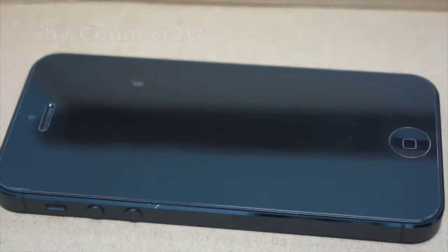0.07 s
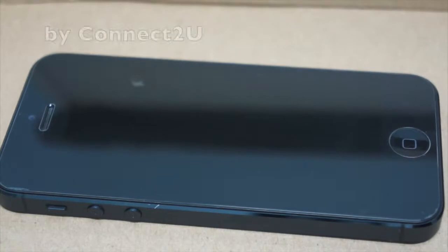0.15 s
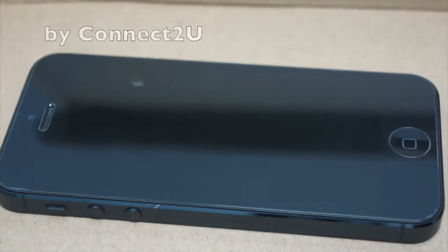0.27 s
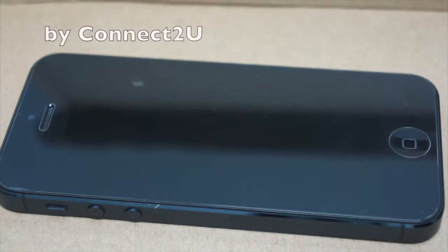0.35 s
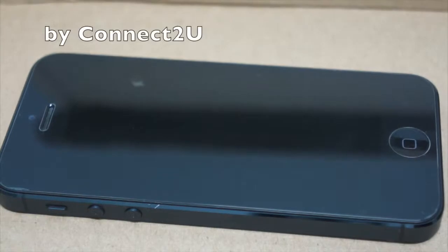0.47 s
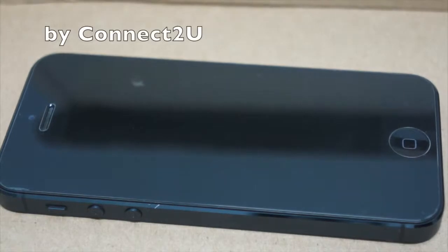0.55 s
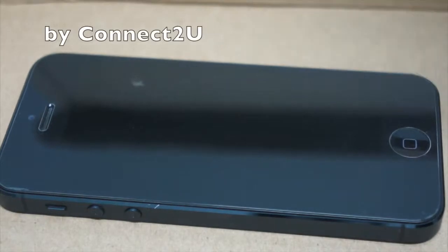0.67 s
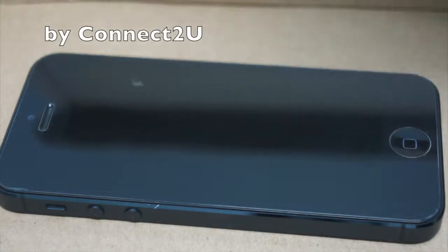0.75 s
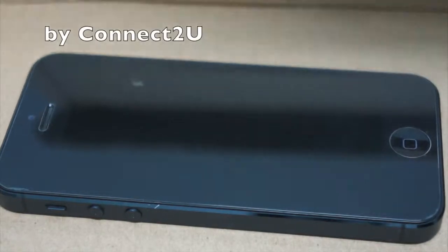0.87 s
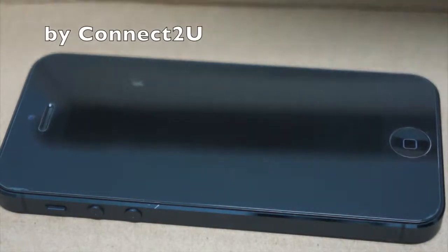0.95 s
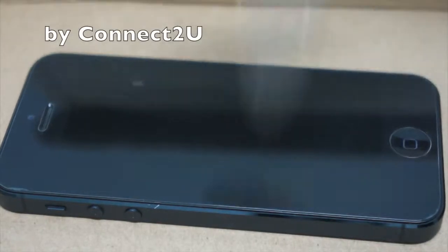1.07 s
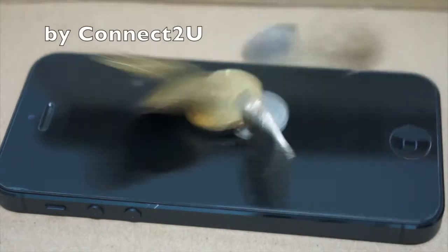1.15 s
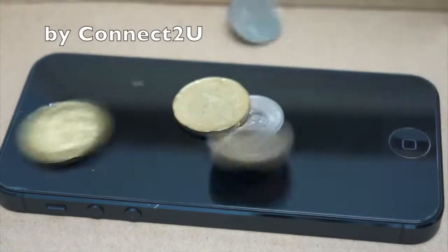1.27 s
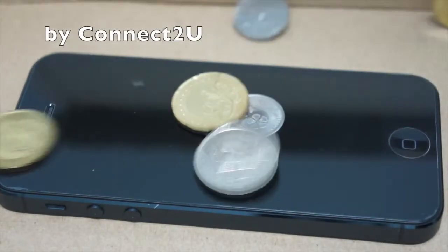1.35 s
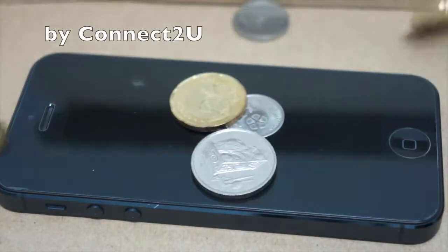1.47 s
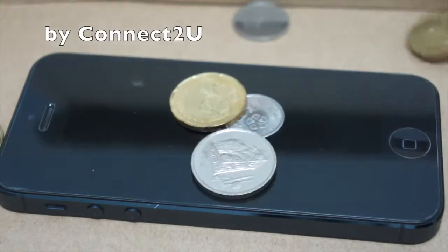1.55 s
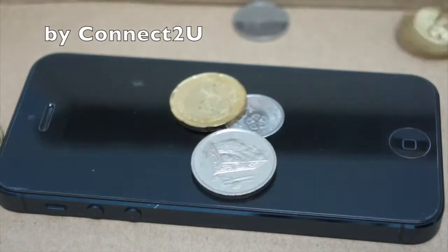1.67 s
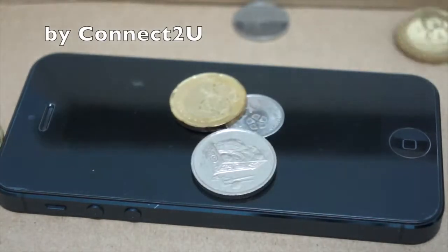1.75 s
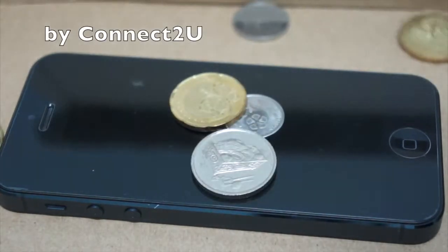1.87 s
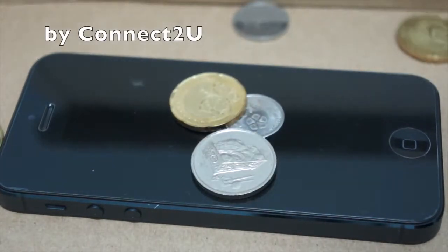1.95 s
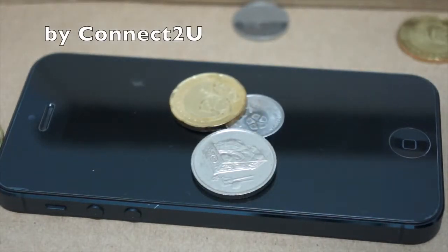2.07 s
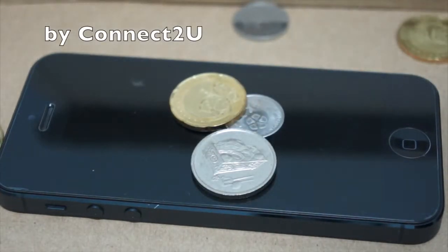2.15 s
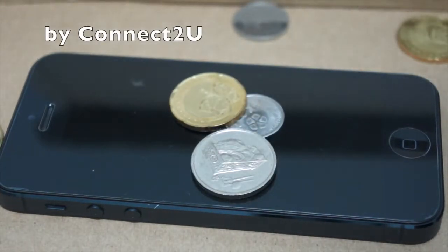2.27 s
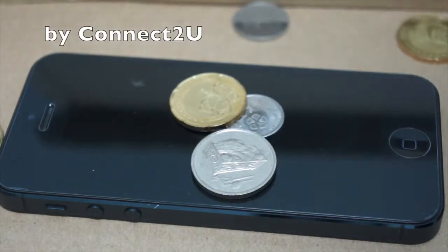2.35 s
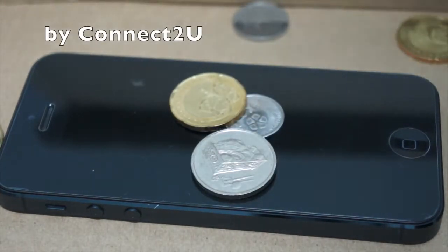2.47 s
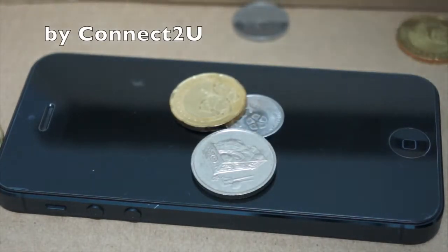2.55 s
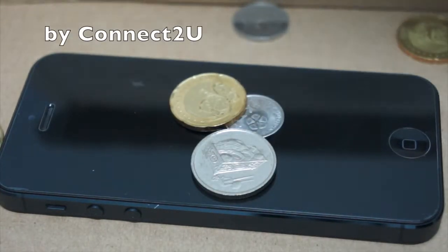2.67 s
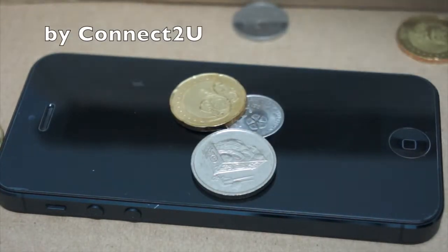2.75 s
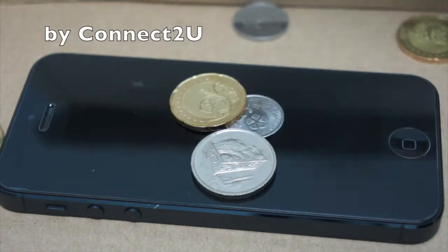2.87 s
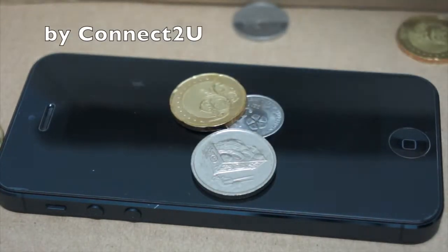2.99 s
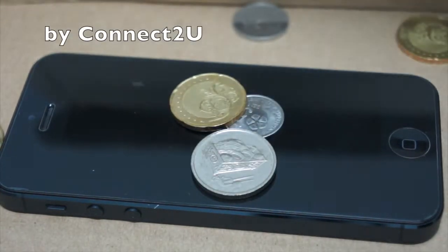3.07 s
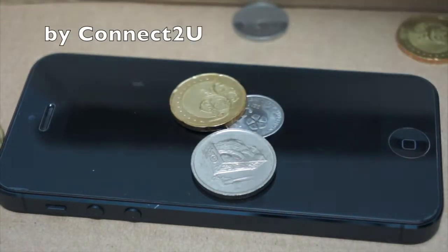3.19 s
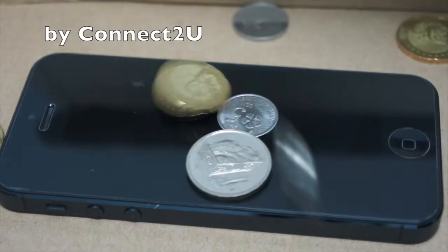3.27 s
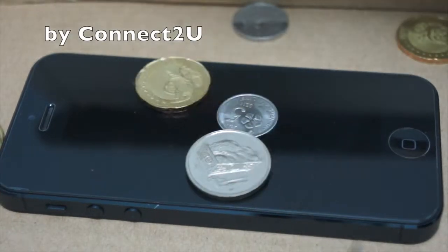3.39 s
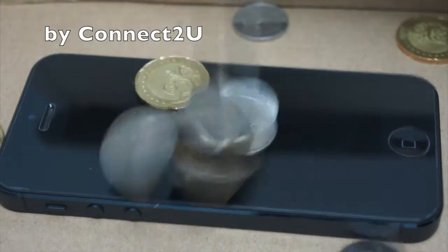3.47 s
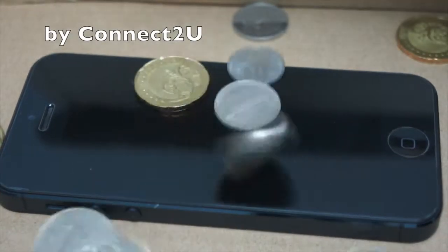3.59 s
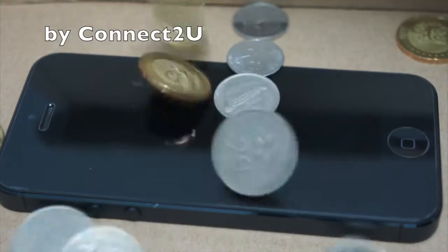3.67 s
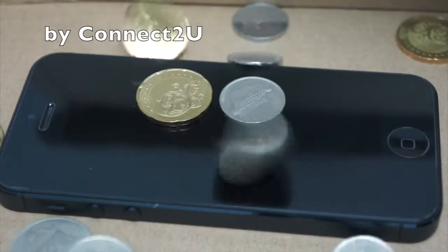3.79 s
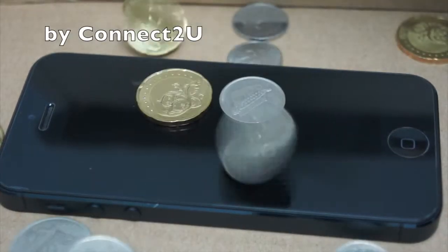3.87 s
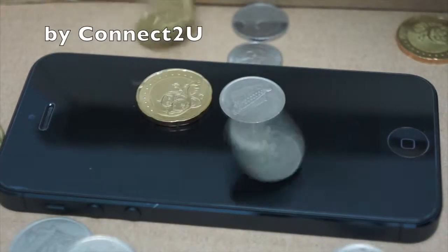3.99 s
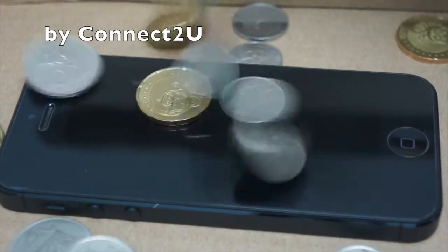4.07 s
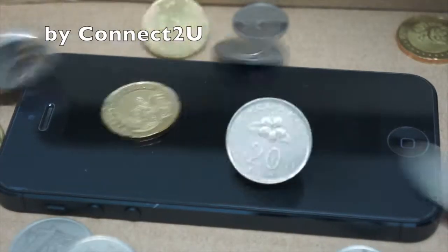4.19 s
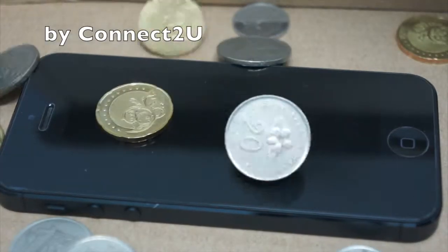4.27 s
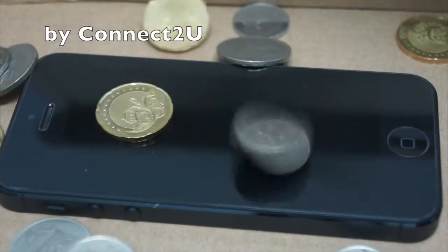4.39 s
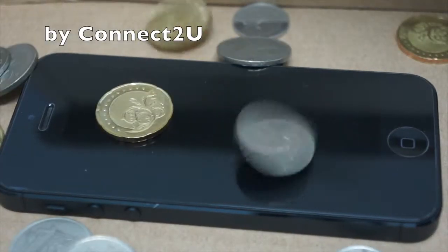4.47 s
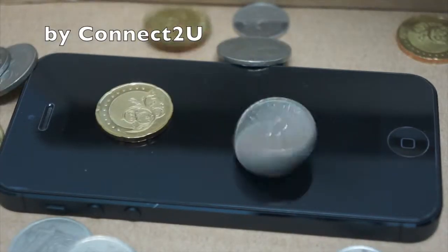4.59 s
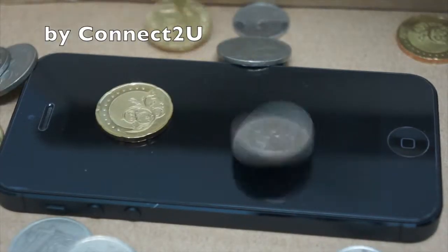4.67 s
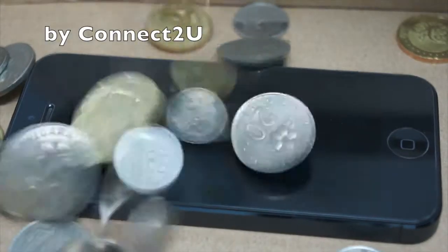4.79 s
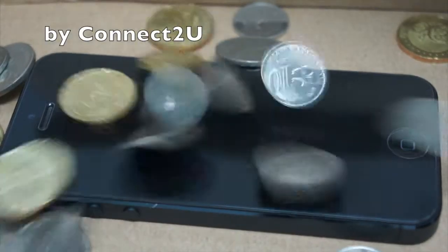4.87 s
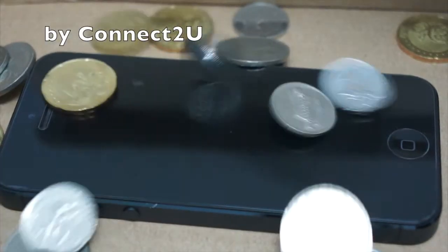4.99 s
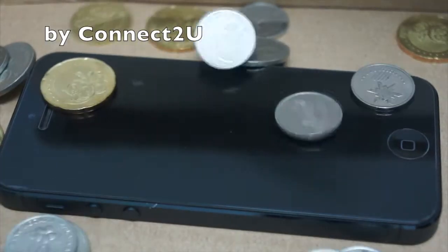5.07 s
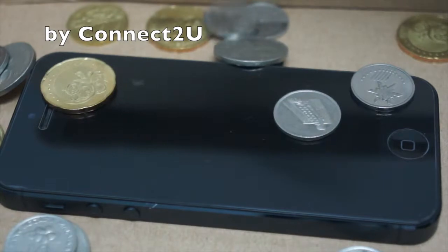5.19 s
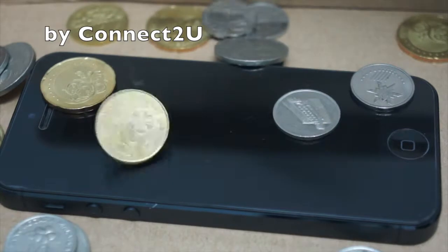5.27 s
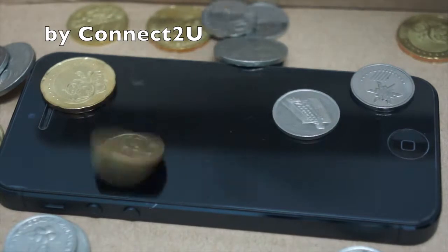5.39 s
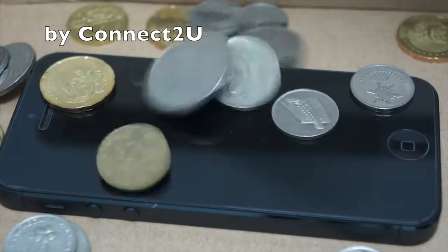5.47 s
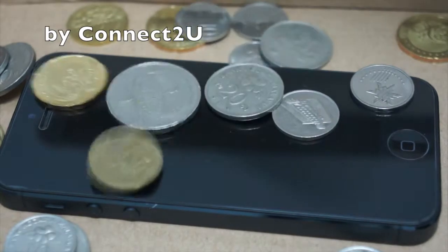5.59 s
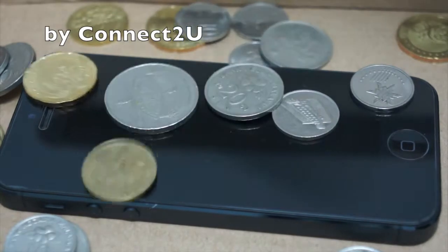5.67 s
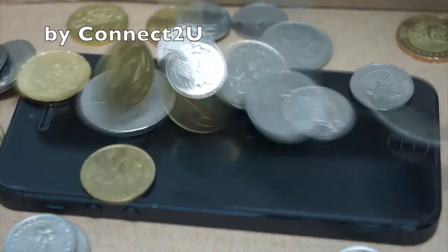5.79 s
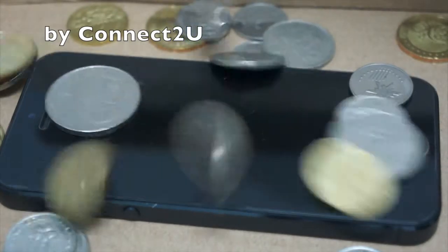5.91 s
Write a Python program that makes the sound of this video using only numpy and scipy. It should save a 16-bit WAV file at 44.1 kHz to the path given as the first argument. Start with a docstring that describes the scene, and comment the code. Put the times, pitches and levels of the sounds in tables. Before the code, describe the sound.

Loose coins jingle in a hand, then clatter in two bright showers onto a phone's glass and the cardboard box around it.

```python
"""Coins falling on glass and cardboard

Coins jingle in a hand, then fall in two showers onto a phone's glass face that lies in a cardboard box.
Each blow is a filtered noise crack plus damped modes: coins chink, glass clacks, cardboard slaps and thuds.
Sliding coins are crowds of such blows at chance times. Ringing coins are dying sines that swell first,
as the recorder's gain recovers after a blow.
Diffuse noise gives the small room's reply and its tone; a close stereo recorder limits the peaks."""
import sys
import numpy as np
from scipy import signal
from scipy.fft import rfft, irfft, next_fast_len
from scipy.io import wavfile
from scipy.ndimage import uniform_filter1d, minimum_filter1d, map_coordinates

SR = 44100
rng = np.random.default_rng(int(sys.argv[2]) if len(sys.argv) > 2 else 0)


def bounce(signal):
    """Save signal as a 16-bit WAV file at the path given by the first command-line argument."""
    frames = np.transpose(np.atleast_2d(signal))
    limited = np.clip(frames, -1, 1)
    pcm = np.round(limited * 32767).astype(np.int16)
    wavfile.write(sys.argv[1], SR, pcm)


N = 261954

# Room tone: (frequency [Hz], relative level per Hz [dB])
AIR_SPECTRUM = [(20, -34), (100, -19.5), (260, 1.5), (700, 1.5), (1300, -0.5), (2600, -4.5), (5000, -11.5),
                (11000, -1.5)]
# Room tone: (time [s], level [dB])
AIR_LEVEL = [(0, -120), (.1, -120), (.115, -47), (.7, -48.5), (1.1, -52), (2.2, -60.5), (3.2, -57),
             (5.9, -88)]
# Decay of the room: (frequency [Hz], 60 dB decay time [s])
ROOM_T60 = [(150, 0.41), (800, 0.39), (3000, 0.44), (10000, 0.19)]
# Left-right likeness of diffuse sound: (frequency [Hz], correlation [1])
LIKENESS = [(100, 1), (400, 0.94), (900, 0.89), (2000, 0.59), (4500, 0.38), (10000, 0.29)]
# Level of the bass in the coin sounds and their echo: (time [s], level [dB])
BASS_LEVEL = [(0, -6), (2.0, 3.5), (2.2, -6), (3.4, 3), (3.85, 3.5), (4.1, -3.5), (5.24, -3), (5.32, -3.5),
              (5.94, -9.5)]

# Colour of flat noise and of each struck body: (frequency [Hz], relative level per Hz [dB])
WHITE = [(20, 0), (20000, 0)]
BOX_SPECTRUM = [(60, -36.5), (130, -48.5), (240, -19), (480, -6), (650, -0.5), (860, 4), (1200, 0),
                (1700, -19)]
CARD_SPECTRUM = [(1200, -9), (1800, -2), (3200, -1.5), (4000, -7.5), (5500, -13.5)]
PHONE_SPECTRUM = [(150, -26.5), (550, -23.5), (820, -0.5), (1150, -0.5), (1500, 0), (2000, -26.5)]
GLASS_SPECTRUM = [(1200, -25), (1500, -18.5), (1900, -9.5), (2700, -5.5), (5500, -1.5), (7500, -4)]
COIN_SPECTRUM = [(3500, -13), (5300, -9.5), (7000, -3), (8600, 1.5), (10200, 2), (11000, -8.5),
                 (12000, -39.5)]
# Modes of each struck body: (frequency [Hz])
BOX_MODES = [254, 399, 602, 681, 735, 841, 845, 934]
CARD_MODES = [1573, 1795, 1950, 2140, 2286, 2570, 3140]
PHONE_MODES = [950, 1100, 1203, 1198]
GLASS_MODES = [2650, 2808, 3194, 3740, 4170]

# The handful is shaken or shifted:
# (time [s], length [s], relative chink level [dB], relative clack level [dB])
JINGLES = [(0.105, .11, -31, -40), (0.303, 0.018, -31.5, -41), (0.383, 0.19, -45.5, -41),
           (0.702, 0.069, -30, -40), (0.89, 0.052, -45, -62), (0.613, 0.14, -74, -58),
           (2.104, 0.13, -33, -45), (2.158, 0.16, -28.5, -49), (2.41, 0.07, -32, -44),
           (2.518, 0.12, -48, -49), (2.619, 0.052, -31, -31.5), (2.732, 0.094, -58, -51),
           (2.887, 0.1, -62, -57), (3.214, 0.04, -44.5, -42.5)]
# A spill of coins lands and skitters: (time [s], length [s], relative chink level [dB],
# relative clack level [dB], relative knock level [dB], share on the cardboard before clipping [1])
SPILLS = [(1.143, 0.08, -23, -26, -25.5, .5), (1.242, 0.28, -34.5, -31, -26.5, 1.2),
          (1.544, 0.024, -34.5, -30, -26, .9), (1.586, 0.21, -26, -39, -35.5, .95),
          (1.812, .15, -21.5, -34.5, -28.5, .95), (1.991, 0.025, -24.5, -34, -29, .95),
          (3.271, 0.075, -30, -30.5, -31.5, 0.07), (3.374, 0.057, -30.5, -34, -28, 4),
          (3.513, 0.36, -29.5, -32, -29.5, .6), (3.874, 0.21, -57, -36.5, -33, 0.7),
          (4.104, 0.11, -30, -33.5, -39.5, 0.5), (4.224, 0.08, -42, -29, -28, 1),
          (4.328, .2, -50, -38, -43, 0.55), (4.54, 0.1, -25.5, -32.5, -40.5, 0.03),
          (4.662, 0.091, -37, -38, -35.5, .6), (4.777, 0.11, -25.5, -30.5, -30, 0.7),
          (4.92, 0.14, -27.5, -30.5, -30, 0.8), (5.072, 0.11, -36.5, -39, -37.5, .8),
          (5.221, 0.018, -36, -46, -37, -2), (5.272, 0.033, -34, -34, -46.5, 0.4),
          (5.343, 0.036, -40, -42, -46, .05), (5.455, 0.1, -28, -35.5, -36.5, 0.45),
          (5.593, 0.089, -38.5, -38.5, -41, -0.74), (5.76, 0.019, -31.5, -37, -41, 1),
          (5.818, 0.1, -27, -30, -31.5, 0.34)]
# Ringing coins, and one faint scrape of a rim near 4 kHz:
# (time [s], pitch [Hz], relative level [dB], swell time [s], 60 dB decay time [s])
RINGS = [(.108, 7950, -34.5, 0.0068, 0.51), (0.367, 4035, -50, 0.031, .2),
         (.755, 10750, -25.5, 0.0086, 0.13), (.955, 10950, -34, 0.0064, 0.14),
         (.99, 8050, -53, 0.015, 0.26), (1.465, 10800, -29, 0.01, 0.2), (1.902, 9770, -19.5, 0.021, 0.43),
         (2.237, 8850, -19.5, 0.0059, 0.19), (2.245, 10530, -22.5, 0.014, 0.24),
         (2.304, 8400, -29, 0.019, 0.077), (2.984, 9050, -51, .015, 0.23),
         (3.28, 10770, -22.5, 0.037, 0.081), (3.52, 10580, -20, 0.032, 0.87),
         (3.555, 10110, -19, 0.033, 0.58), (3.702, 10105, -18.5, 0.0095, 0.14),
         (3.73, 10960, -23.5, 0.017, 0.15), (3.77, 10870, -31, 0.04, 0.17),
         (3.952, 8870, -31.5, 0.054, 0.19), (4.135, 8828, -16, 0.056, .23), (4.695, 8600, -22, .01, 0.074),
         (5.344, 7327, -41.5, 0.033, 0.55), (5.47, 9740, -16.5, 0.027, .25),
         (5.547, 7280, -19, 0.0099, 0.021), (5.6, 9270, -33, 0.0073, .92), (5.629, 8700, -28, .005, 0.73)]
# Coin on cardboard: (time [s], relative slap level [dB], relative thud level [dB])
BOX_HITS = [(1.1754, -20.5, -19), (1.2451, -24, -15), (1.2535, -22, -19.5), (1.2961, -18, -17.5),
            (1.3623, -18.5, -12.5), (1.4667, -24.5, -15.5), (1.5302, -19.5, -20.5), (1.5571, -20, -20),
            (1.579, -19.5, -36), (1.6345, -23.5, -23), (1.7153, -34, -22.5), (1.7907, -25.5, -22.5),
            (1.9887, -27.5, -22.5), (3.3326, -26.5, -40.5), (3.4326, -16, -32), (3.5811, -25.5, -24),
            (3.61, -23, -23), (3.685, -20, -15.5), (3.7947, -19.5, -18.5), (3.8079, -18, -26),
            (3.8271, -21.5, -23), (3.8918, -46, -25), (3.9018, -19, -24), (3.9292, -20, -43),
            (4.2378, -18.5, -24), (4.2793, -15.5, -23.5), (4.2849, -24, -26), (4.9324, -17.5, -24),
            (4.9734, -29, -49), (5.0228, -22.5, -36), (5.1729, -27.5, -55), (5.2371, -32.5, -24.5),
            (5.5297, -26.5, -45)]
# Coin on the phone:
# (time [s], relative chink level [dB], relative clack level [dB], relative knock level [dB])
GLASS_HITS = [(1.1516, -11, -14, -42), (1.2754, -41, -23.5, -24), (1.3762, -23.5, -25.5, -44),
              (1.4068, -21.5, -38, -27), (1.4164, -16.5, -21, -21.5), (1.5109, -27, -47, -27),
              (2.0326, -20, -50, -42), (2.7929, -61, -41.5, -58), (2.8738, -47, -47, -73),
              (2.9862, -44, -49, -73), (3.1119, -45, -47, -72), (3.192, -46, -48, -74),
              (3.2598, -22.5, -25.5, -26.5), (3.3924, -25, -35, -29.5), (3.3991, -21, -34, -32),
              (3.503, -41, -23.5, -22.5), (3.5087, -11, -14, -42), (3.6486, -41, -24, -29.5),
              (3.6755, -35, -18.5, -24), (3.6795, -27, -30, -32), (3.76, -35, -24.5, -28.5),
              (3.8011, -30, -21, -28), (4.0886, -17, -16, -21.5), (4.1126, -23, -25, -28),
              (4.1423, -20, -23.5, -27), (4.3698, -34.5, -36, -33.5), (4.4777, -32, -37, -53),
              (4.5627, -24, -37, -43), (4.7744, -24, -21, -27.5), (4.782, -32, -23.5, -30.5),
              (4.8062, -17, -14.5, -23), (4.8445, -36, -15.5, -24.5), (4.8588, -18, -17.5, -29),
              (4.8973, -11, -22.5, -28), (5.106, -33, -32, -31), (5.1273, -30, -24, -31.5),
              (5.2826, -23.5, -23.5, -28), (5.4615, -20, -18, -24.5), (5.7578, -21.5, -27.5, -29.5),
              (5.805, -22.5, -24.5, -26), (5.8418, -30, -25, -35), (5.8748, -23, -23, -32)]
# Coin on coin: (time [s], relative chink level [dB])
CLINKS = [(0.1587, -28), (0.3123, -29), (0.4363, -17), (0.5781, -27), (0.724, -26), (0.7437, -21.5),
          (0.765, -22), (0.9092, -33), (0.924, -30.5), (.959, -31.5), (1.835, -35), (1.9289, -7),
          (2.0771, -23), (2.1315, -21.5), (2.2097, -19), (2.2404, -21), (2.2729, -32), (2.2968, -19.5),
          (2.3213, -19), (2.3291, -21), (2.3843, -28), (2.431, -16), (2.443, -29), (2.476, -22.5),
          (2.5538, -31), (3.3134, -14.5), (3.3326, -18.5), (3.4667, -25), (3.8574, -18), (4.6036, -13.5),
          (4.709, -17), (4.8707, -18), (4.988, -19.5), (5.5548, -18.5), (5.6106, -22), (5.8358, -21)]

HARD_T60 = .012  # s, decay of a hard contact's crack
CLINK_CLACK_DB = -20.5  # the clack in a clink, against its chink
REBOUND_S, REBOUND_DB = .008, -11  # far edge of a tipping coin: median delay, level against the blow
JINGLE_RISE_S, JINGLE_T60 = 0.024, 0.18  # s
SPILL_RISE_S, SPILL_T60, KNOCK_T60 = 0.0083, 0.29, 0.2  # s; the heavy knocks end before the light chatter
WOBBLE_START_S, WOBBLE_END_S, WOBBLES_PER_S, WOBBLE_SWING_DB = 4.289, 4.75, 21, 8
TURNS_PER_S = 9.6  # median tumbling rate of a ringing coin
BASS_HZ, TOP_HZ = 516, 11200  # upper edge of the bass, band limit of the recorder


def amp(db):
    """Level is logarithmic: 20 dB is a factor of ten in amplitude."""
    return 10 ** (np.asarray(db) / 20)


def unit(x):
    """Equal mean power: scales to rms 1."""
    return x / np.sqrt(np.mean(x ** 2) + 1e-20)


def unit_energy(x):
    """Equal energy: scales to a mean energy of 1 per channel."""
    return unit(x) / np.sqrt(x.shape[-1])


def fade(t, t60):
    """Exponential damping: the amplitude falls 60 dB in t60 seconds."""
    return np.exp(-np.log(1000) * t / t60)


def along(points, hz):
    """Interpolation of (frequency, value) points on a logarithmic frequency axis."""
    f, v = np.transpose(points)
    return np.interp(np.log(hz + 1), np.log(f + 1), v)


def curves(rows):
    """Linear interpolation in time: one value per sample for each column after the time."""
    s, *cols = np.transpose(rows)
    return [np.interp(np.arange(N) / SR, s, c) for c in cols]


def add(track, s, sound):
    """Superposition: mixes a sound into a track at time s."""
    start = max(round(s * SR), 0)
    track[:, start:start + sound.shape[-1]] += sound[:, :max(N - start, 0)]


def noise(spectrum, size):
    """Diffuse field: coloured stereo noise of rms 1, alike in the bass and unlike in the treble."""
    hz = np.fft.rfftfreq(size, 1 / SR)
    turn = np.arccos(np.clip(along(LIKENESS, hz), -1, 1)) / 2
    high_skirt = 1 / (1 + (hz / spectrum[-1][0] / 1.5) ** 8)
    low_skirt = 1 / (1 + (spectrum[0][0] / (hz + 1) / 1.5) ** 4)
    gain = amp(along(spectrum, hz)) * high_skirt * low_skirt
    source = rfft(rng.standard_normal((2, size)))
    mid, side = irfft(source * gain * [np.cos(turn), np.sin(turn)], size)
    return unit(np.array([mid + side, mid - side]))


def colour(x, spectrum):
    """Minimum-phase filtering: a causal response with the given spectrum, falling away beyond its ends."""
    size = next_fast_len(x.shape[-1] + SR // 50)
    hz = np.fft.rfftfreq(size, 1 / SR)
    high_skirt = 1 / (1 + (hz / spectrum[-1][0] / 1.5) ** 6)
    low_skirt = 1 / (1 + (spectrum[0][0] / (hz + 1) / 1.5) ** 2)
    gain = amp(along(spectrum, hz)) * high_skirt * low_skirt
    # Folding the cepstrum onto positive times makes the filter causal.
    cepstrum = irfft(np.log(gain + 1e-6), size)
    cepstrum[1:size // 2] *= 2
    cepstrum[size // 2:] = 0
    return irfft(rfft(x, size) * np.exp(rfft(cepstrum)), size)[..., :x.shape[-1]]


def room_tone():
    """Stationary diffuse noise, coloured by frequency and raised and lowered by a level curve."""
    return amp(curves(AIR_LEVEL)[0]) * noise(AIR_SPECTRUM, size=N)


def room(x):
    """Reverberation of a small room: each frequency decays exponentially at its own rate."""
    hz, t, z = signal.stft(noise(WHITE, size=SR // 2), SR, nperseg=256)
    decay = fade(t, along(ROOM_T60, hz)[:, None])
    tail = signal.istft(z * decay, SR, nperseg=256)[1]
    seconds = np.arange(tail.shape[1]) / SR
    tail = tail * (1 - np.exp(-(seconds / 0.003) ** 2))  # the first walls are close by
    return signal.fftconvolve(x, unit_energy(tail), axes=1)[:, :N]


def contact(spectrum, modes, crack_t60, ring_t60, ring_db):
    """Impact excitation: a short crack, and damped modes struck at new strengths."""
    t = np.arange(SR // 10) / SR
    hz = np.array(modes)[:, None]
    crack = colour(noise(WHITE, size=len(t)) * fade(t, crack_t60), spectrum)
    # The two channels differ more in phase at higher modes.
    stereo_phase = rng.normal(0, 1, (2, *hz.shape)) * hz / 12000
    phase = rng.uniform(0, 2 * np.pi, hz.shape) + stereo_phase
    strength = amp(rng.normal(0, 6.6, hz.shape))
    ring = np.sum(strength * np.sin(2 * np.pi * hz * t + phase), axis=1)
    ring = colour(ring * fade(t, ring_t60), spectrum)
    return unit_energy(unit_energy(crack) + amp(ring_db) * unit_energy(ring))


def thud():
    """Low modes of a hollow body: the box takes the blow."""
    return contact(BOX_SPECTRUM, BOX_MODES, crack_t60=0.044, ring_t60=0.045, ring_db=-1.0)


def slap():
    """Strongly damped plate modes: a coin's face lands on cardboard."""
    return contact(CARD_SPECTRUM, CARD_MODES, crack_t60=0.035, ring_t60=0.06, ring_db=-6.5)


def knock():
    """Modes of a stiff body: the phone takes the blow."""
    return contact(PHONE_SPECTRUM, PHONE_MODES, HARD_T60, ring_t60=0.037, ring_db=-3.5)


def clack():
    """Hard contact with a damped plate: a rim strikes the glass."""
    return contact(GLASS_SPECTRUM, GLASS_MODES, HARD_T60, ring_t60=0.022, ring_db=-10)


def chink():
    """High modes of small discs: two coins of chance sizes touch, and their neighbours soon damp them."""
    return contact(COIN_SPECTRUM, rng.uniform(7600, 11100, size=3), HARD_T60, ring_t60=0.056, ring_db=-3)


def hollow_contact():
    """Resonance dominates the blow: a contact sounds two hollow modes."""
    return contact([(1000, 0), (3000, 0)], [1140, 2770], HARD_T60, ring_t60=0.039, ring_db=17)


def jostle(body, level_db, rate, count=12):
    """Random impacts: contacts at chance times (rate per second), shared among differing spots."""
    taps = (rng.random(N) < rate / SR) * amp(5 * rng.standard_normal(N))
    crowd = np.abs(uniform_filter1d(taps ** 2, size=700)) + 0.18 * np.mean(taps ** 2)
    taps = taps / np.sqrt(crowd) * amp(level_db)  # close contacts share the energy at hand
    spot = rng.integers(count, size=N)
    sounds = [body() for _ in range(count)]
    out = np.zeros((2, N))
    for i in np.flatnonzero(taps):
        add(out, i / SR, taps[i] * sounds[spot[i]])
    return out


def flurries(rows, rise, t60):
    """Addition of powers: level [dB] of flurries that rise, hold and die as the coins come to rest."""
    t, power = np.arange(SR) / SR, np.zeros((1, N))
    for s, length, db in rows:
        shape = np.minimum(t / rise, 1) * fade(np.maximum(t - length, 0), t60)
        add(power, s, (amp(db) * shape[None]) ** 2)
    return 10 * np.log10(power[0] + 1e-14)


def hollow_slide(level_db):
    """Random impacts: coins slide in the cupped hand, sounding two hollow resonances."""
    t = np.arange(N) / SR
    level = np.interp(t, [2.1, 2.14, 2.25, 2.33, 2.37], [-120, -0.5, -6.5, -2.0, -24]) + level_db
    return jostle(hollow_contact, level, rate=120) * (t < 2.37)


def wobble(level_db, phone_db):
    """Periodic loading: a tilted coin rolls on its rim, leaning on the phone and the box at each dip."""
    t = np.arange(N) / SR
    dip = np.sin(np.pi * WOBBLES_PER_S * (t - WOBBLE_START_S)) ** 2
    rolling = (t > WOBBLE_START_S) & (t < WOBBLE_END_S)
    level = np.where(rolling, level_db + WOBBLE_SWING_DB * (dip - 1), -140)
    return jostle(thud, level, rate=820) + jostle(knock, level + phone_db, rate=540)


def jingle(chink_db, clack_db):
    """Random sliding impacts: coins pass over one another in the hand."""
    s, length, chinks, clacks = np.transpose(JINGLES)

    def level(db):
        return flurries(zip(s, length, db), JINGLE_RISE_S, JINGLE_T60)

    return jostle(chink, level(chinks + chink_db), rate=750) + jostle(clack, level(clacks + clack_db), rate=890)


def rattle(chink_db, clack_db, knock_db):
    """Division of impact energy: spilled coins slide and bounce on the phone and the cardboard."""
    s, length, chinks, clacks, knocks, share = np.transpose(SPILLS)

    def light(db):
        return flurries(zip(s, length, db), SPILL_RISE_S, SPILL_T60)

    def heavy(db):
        return flurries(zip(s, length, db), SPILL_RISE_S, KNOCK_T60)

    share = np.clip(share, .01, .99)
    on_phone, on_box = 10 * np.log10([1 - share, share])
    coins = jostle(chink, light(chinks + chink_db), rate=750)
    phone = (jostle(clack, light(clacks + clack_db + on_phone), rate=750)
             + jostle(knock, heavy(knocks + knock_db + on_phone), rate=400))
    box = (jostle(slap, light(clacks + clack_db + on_box), rate=300)
           + jostle(thud, heavy(knocks + knock_db + on_box), rate=200))
    return coins + phone + box


def rings(level_db, depth, flutter):
    """Damped vibration: a coin sings on after a blow, its turning faces sweeping past the microphones."""
    out, t = np.zeros((2, N)), np.arange(SR // 2) / SR
    for s, hz, db, swell, t60 in RINGS:
        turns = TURNS_PER_S * np.exp(rng.normal(0, 0.29))
        # The swell stands for the recorder's gain recovering after a blow.
        life = np.minimum(t / swell, 1) ** 0.69 * fade(np.maximum(t - swell, 0), t60)
        facing = 1 - np.clip(depth, 0, 1) * np.sin(2 * np.pi * turns * (t - swell)) ** 2
        # Slow and fast random wandering of the phase [rad]
        drift = flutter * map_coordinates(rng.standard_normal(40), [t * 60])
        chatter = map_coordinates(rng.standard_normal(110), [t * 200])
        phase = drift + .3 * chatter + rng.normal(0, .4, (2, 1))
        facing = facing * amp(2 * chatter[::-1])  # it chatters against the glass as it rings
        add(out, s, amp(db + level_db) * life * facing * np.sin(2 * np.pi * hz * t + phase))
    return out


def hits(table, bodies, level_db):
    """Coupled bodies: each blow sounds every body it touches, then once more as the coin tips over."""
    out = np.zeros((2, N))
    for s, *levels in table:
        sides = amp(rng.normal(0, 1) * np.array([[1], [-1]]))  # chance left-right balance
        rebound = REBOUND_S * 2 ** rng.normal(0, .5)
        for delay, loss_db in ((0, 0), (rebound, REBOUND_DB)):
            blow = sum(amp(db + level_db + loss_db) * body() for db, body in zip(levels, bodies))
            add(out, s + delay, sides * blow)
    return out


def shape_bass(x):
    """Band splitting: the bass follows its level curve while the rest passes unchanged."""
    size = next_fast_len(N + SR // 4)
    hz = np.fft.rfftfreq(size, 1 / SR)
    bass = irfft(rfft(x, size) / (1 + (hz / BASS_HZ) ** 6), size)[:, :N]
    return x + (amp(curves(BASS_LEVEL)[0]) - 1) * bass


def scene():
    """Superposition of direct sound, reverberation and room tone."""
    clinks = [(s, db, db + CLINK_CLACK_DB) for s, db in CLINKS]
    blows = (hits(clinks, [chink, clack], level_db=23)
             + hits(GLASS_HITS, [chink, clack, knock], level_db=25)
             + hits(BOX_HITS, [slap, thud], level_db=21.5))
    crowd = (jingle(chink_db=2.5, clack_db=-0.5)
             + rattle(chink_db=0.5, clack_db=1, knock_db=-3.0)
             + hollow_slide(level_db=-42.5)
             + wobble(level_db=-33, phone_db=-15))
    singing = rings(level_db=3, depth=0.59, flutter=0.52)
    echo = room(amp(-10) * blows + amp(-11.5) * crowd + amp(-9) * singing)
    balance = amp([[.6], [-.6]])  # left slightly louder than right
    return shape_bass(blows + crowd + singing + echo) * balance + room_tone()


def limiter(x, ceiling_db, recovery=400):
    """Gain control: peaks pull the gain down at once; it climbs back at recovery dB a second."""
    excess_db = np.maximum(20 * np.log10(np.abs(x).max(axis=0) + 1e-9) - ceiling_db, 0)
    climb = recovery * np.arange(N) / SR
    gain = amp(climb - np.maximum.accumulate(excess_db + climb))
    return x * uniform_filter1d(minimum_filter1d(gain, size=21), size=21)


def record(dry):
    """Band limitation: the recorder limits peaks, then cuts steeply above its top frequency."""
    size = next_fast_len(N + SR // 4)
    hz = np.fft.rfftfreq(size, 1 / SR)
    band = 1 / np.sqrt(1 + (hz / TOP_HZ) ** 190)
    return irfft(rfft(limiter(dry, ceiling_db=-4.5), size) * band, size)[:, :N]


dry = scene()
out = record(dry)
bounce(out)
```